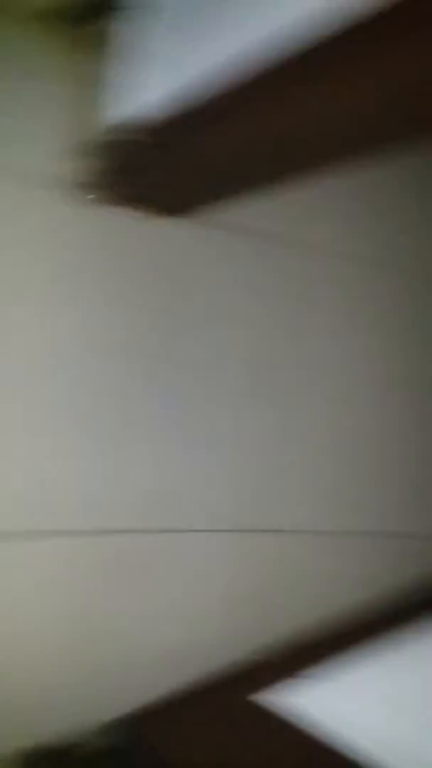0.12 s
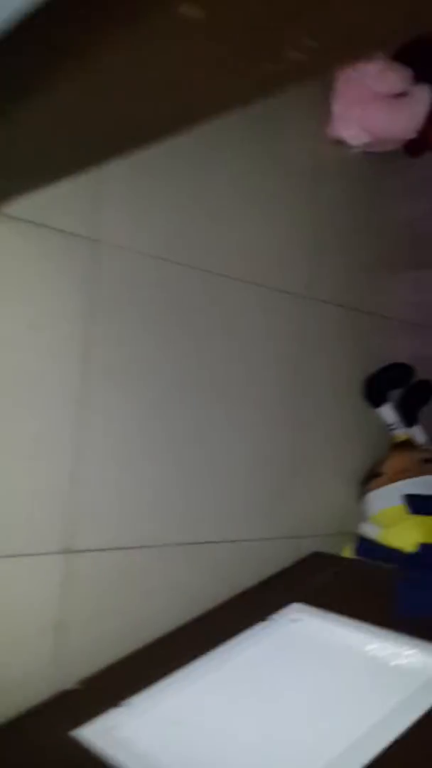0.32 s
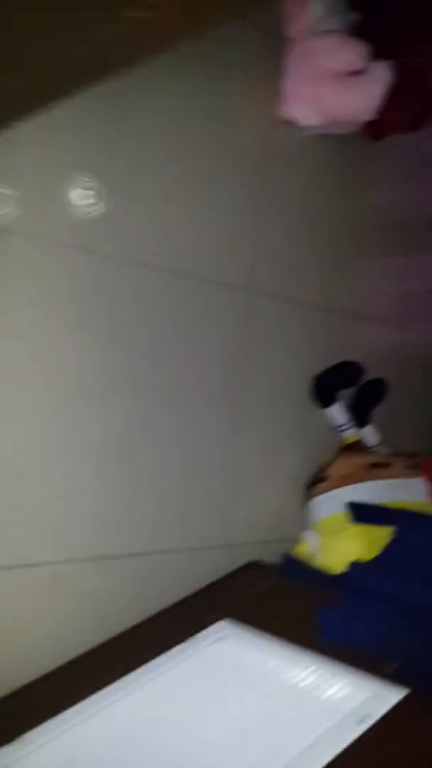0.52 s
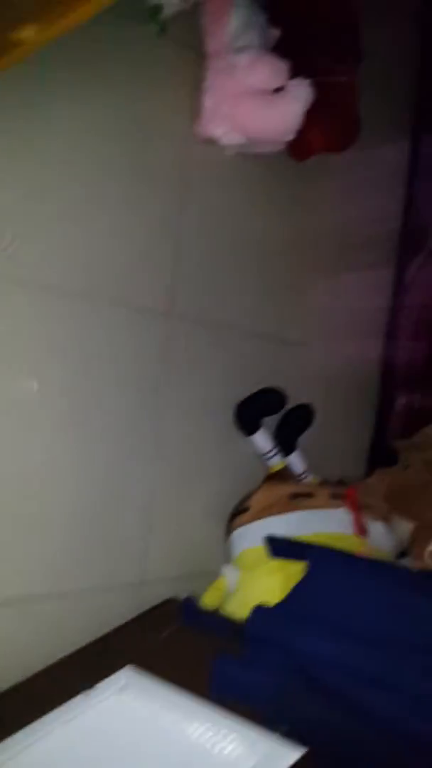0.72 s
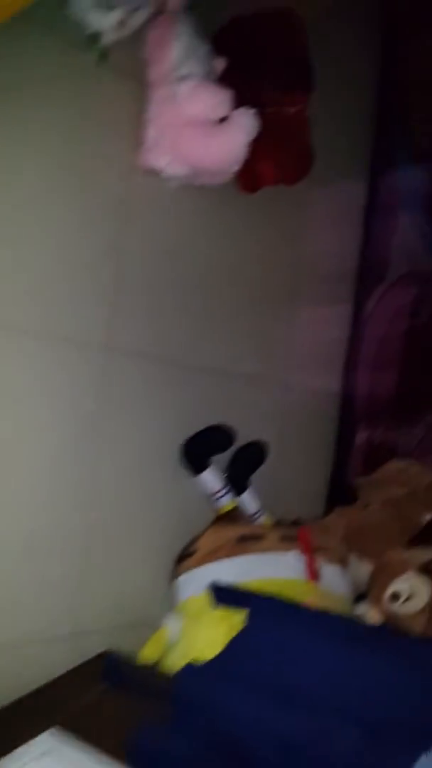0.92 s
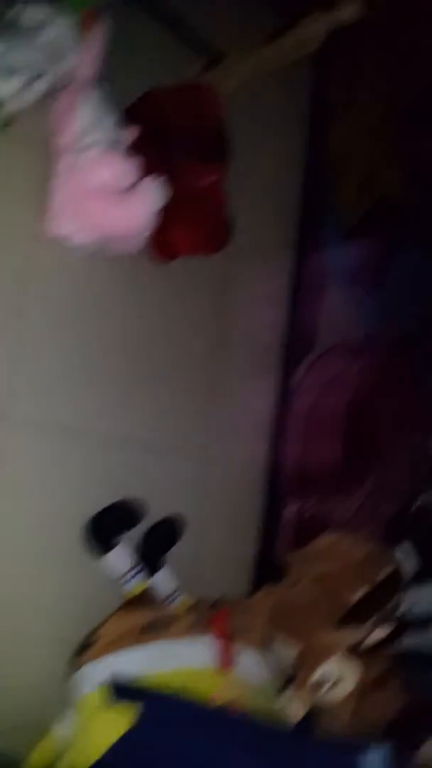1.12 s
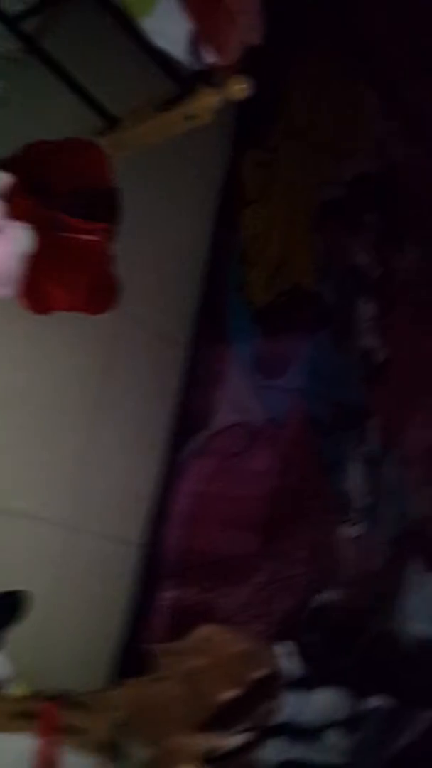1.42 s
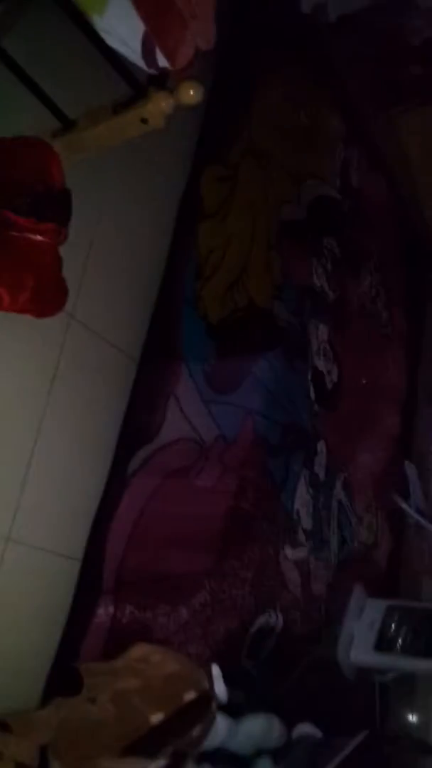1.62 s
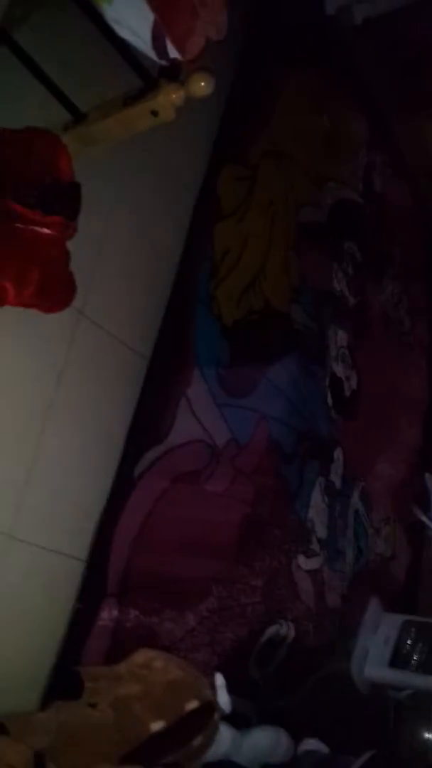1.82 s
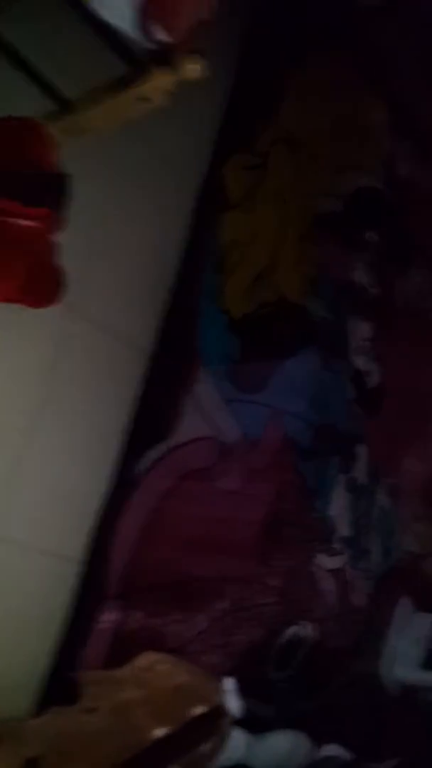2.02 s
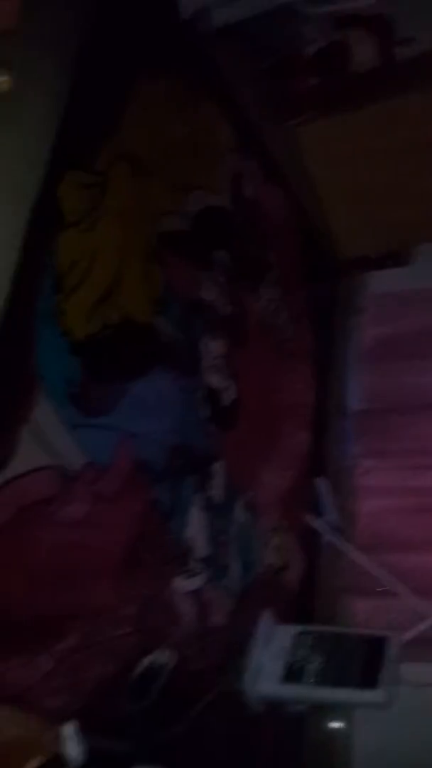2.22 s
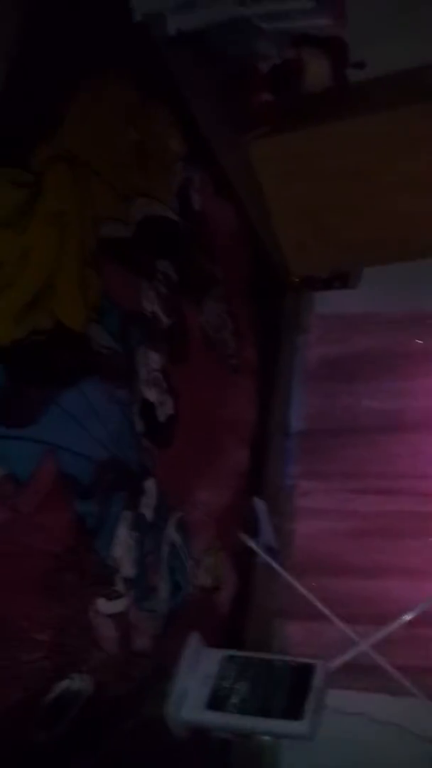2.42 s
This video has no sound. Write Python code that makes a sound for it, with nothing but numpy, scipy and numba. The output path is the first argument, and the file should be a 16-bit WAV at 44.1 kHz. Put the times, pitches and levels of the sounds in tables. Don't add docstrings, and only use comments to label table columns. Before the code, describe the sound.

Water splashes and gurgles around wading feet indoors, with bubbly plops, bright droplets and brief pauses

```python
import sys
import numpy as np
from scipy import signal
from scipy.fft import rfft, irfft, next_fast_len
from scipy.io import wavfile
from scipy.ndimage import uniform_filter1d
from numba import njit

SR = 44100
rng = np.random.default_rng(int(sys.argv[2]) if len(sys.argv) > 2 else 0)


def log_audio(samples):
    frames = np.atleast_2d(samples).T
    limited = np.clip(frames, -1, 1)
    pcm = np.round(limited * 32767).astype(np.int16)
    wavfile.write(sys.argv[1], SR, pcm)


def gain_from_db(level_db):
    decades = np.asarray(level_db, float) / 20
    return 10 ** decades


N = 114660


def unit(x):
    return x / np.sqrt(np.mean(x ** 2))


def read(table, hz):
    table = np.array(table)
    return np.interp(np.log(hz + 1), np.log(table[:, 0]), table[:, 1])


def colour(x, gain):
    size = next_fast_len(N)
    hz = np.arange(size // 2 + 1) * SR / size
    return irfft(rfft(x, size) * gain(hz), size)[..., :N]


def walk(rate):
    hold = int(SR / rate)
    steps = np.repeat(rng.standard_normal(N // 20), max(hold, 20))[:N]
    return unit(uniform_filter1d(steps, hold))


# (frequency [Hz], level [dB per Hz])
ROOM_TONE = [(25, -11), (100, -12), (300, -14.5), (900, -13.5), (2000, -21.5), (3800, -21.5), (6000, -11.5),
             (9000, -18.5), (15000, -26)]


def room_tone():
    def alike(f):
        return 1 / np.sqrt(1 + (f / 700) ** 4)

    shared, own = rng.standard_normal(N), rng.standard_normal((2, N))
    air = colour(shared, lambda f: gain_from_db(read(ROOM_TONE, f)) * alike(f))
    air = air + colour(own, lambda f: gain_from_db(read(ROOM_TONE, f)) * np.sqrt(1.12 - alike(f) ** 2))
    return unit(air) * gain_from_db(-54.5 + 1.0 * walk(4.3))


# (time [s], level [dB])
HANDLING = [(.62, -78), (.7, -64), (.9, -61), (1.05, -58.5), (1.4, -64.5), (1.6, -66), (2.0, -64.5),
            (2.2, -57.5), (2.33, -57), (2.45, -62), (2.55, -80)]


def handling():
    noise = rng.standard_normal(N) + 0.69 * rng.standard_normal((2, N))
    rumble = unit(colour(noise, lambda f: (f / 120) / (1 + (f / 190) ** 4)))
    s, db = np.array(HANDLING).T
    return rumble * gain_from_db(np.interp(np.arange(N) / SR, s, db, left=-75) + 2 * walk(14.92))


# (start [s], level [dB], hold [s], fall [dB per s], spray tilt [dB per octave])
SURGES = [(0.226, -39, 0.015, 98, 1), (0.237, -41, 0.012, 28, 1), (0.347, -35, 0.051, 130, -0.2),
          (0.475, -37.5, 0.065, 93, -0.6), (0.536, -33.5, 0.083, 249, 3), (0.652, -40, 0.055, 107, 1.5),
          (0.786, -37.5, 0.056, 82, -2.3), (0.89, -41, 0.075, 97, 2.2), (0.972, -36.5, 0.081, 107, -3),
          (1.002, -27, 0.13, 110, 0.2), (1.205, -34.5, 0.044, 262, 1.5), (1.301, -35, 0.012, 173, 1.5),
          (1.405, -53.5, 0.0052, 218, 10), (1.424, -60.5, 0.005, 57, 8), (1.739, -47.5, 0.14, 55, -3.5),
          (1.813, -43.5, 0.058, 105, -1), (1.952, -35, 0.088, 121, 0.4), (2.107, -37, 0.049, 194, 1),
          (2.19, -47, 0.058, 123, 0), (2.277, -44.5, 0.043, 194, 2)]


def churn(t, hz):
    s, db, hold, fall, tilt = np.array(SURGES).T[:, :, None]
    rise = np.clip((t - s) / 0.003, 0, 1)
    level = db - fall * np.maximum(t - s - hold, 0) + tilt * np.log2(hz / 2500)
    power = rise ** 2 * gain_from_db(2 * level)
    return 10 * np.log10(power.sum(0) + 1e-12)


# (frequency [Hz], level [dB])
WATER = [(200, -24), (500, -13), (1000, -1), (2000, 2.5), (4000, -7), (6000, -2), (9000, 0), (15000, -9)]


def sheet(lo_hz, hi_hz):
    def gain(f):
        slope = gain_from_db(read(WATER, f)) / np.sqrt(f + 50)
        return slope / (1 + (lo_hz / (f + 1)) ** 4) / (1 + (f / hi_hz) ** 4)

    noise = rng.standard_normal((2, N)) + .5 * rng.standard_normal(N)
    return unit(colour(noise, gain))


def wash():
    t, flicker_db = np.arange(N) / SR, 3.2
    hiss = sheet(2060.0, 14000.0) * gain_from_db(-11 + churn(t, 10100.0) + flicker_db * walk(130))
    slosh = sheet(550.0, 3300.0) * gain_from_db(-12 + churn(t, 600.0) + flicker_db * walk(35.5))
    return hiss + slosh


@njit
def ring(n, at, step, glide, decay, rise, left, right, lag):
    out = np.zeros((2, n + 8192))
    for e in range(len(at)):
        for c in range(2):
            t = at[e] + c * lag[e]
            i = int(t) + 1
            w = step[e]
            g = left[e] if c == 0 else right[e]
            phase, a, r = w * (i - t), 1., 1.
            while a > .004 and i < n and w < 2.6:
                r *= rise[e]
                out[c, i] += g * a * (1 - r) * np.sin(phase)
                phase += w
                w *= glide[e]
                a *= decay[e]
                i += 1
    return out[:, :n]


def bubbles(s, db, hz, cycles, octaves, spread=0.98, rise_cycles=0.95):
    lag_s, lag_spread_s, pan_spread_db = 0.0003055, 0.00017, 2.5
    spot = spread * rng.standard_normal((len(s), 2)).T
    life = np.maximum(cycles, .5) * SR / hz
    pan_db = pan_spread_db * spot[0] / 2
    lag = (lag_s * np.minimum(hz / 1400, 1) ** 2 + lag_spread_s * spot[1]) * SR
    return ring(N, np.maximum(s, .01) * SR, 2 * np.pi * hz / SR, 2 ** (octaves / life), gain_from_db(-30 / life),
                np.exp(-hz / SR / rise_cycles), gain_from_db(db + pan_db), gain_from_db(db - pan_db), lag)


def swarm(count, lo_hz, hi_hz, cycles, octaves, scatter_db, clump_db):
    u, clump = rng.random((count, 4)).T, walk(45.04)
    s, hz = u[0] * N / SR, lo_hz * (hi_hz / lo_hz) ** u[1]
    db = read(WATER, hz) + scatter_db * np.minimum(-np.log(u[2]), 2.4)
    life = cycles * (.5 + u[3])
    norm = np.sqrt(np.sum(gain_from_db(2 * db) * life * SR / hz / 14) / N)
    db = db + churn(s, hz) + clump_db * clump[(u[0] * N).astype(int)]
    return bubbles(s, db, hz, life, octaves * u[3] * 2, rise_cycles=1.28) / norm


def bubble_cloud():
    body = swarm(count=1900, lo_hz=301.1, hi_hz=4490, cycles=16.84, octaves=0.312,
                 scatter_db=4.5, clump_db=1.5)
    fizz = swarm(count=9000, lo_hz=2720, hi_hz=14500, cycles=8.4, octaves=0.18,
                 scatter_db=1.5, clump_db=4.5)
    return gain_from_db(-3.5) * (body + fizz)


# (time [s], peak level [dB], pitch [Hz])
TICKS = [(0.2235, -24.5, 5770), (0.5108, -15.5, 6040), (0.5465, -5, 4680), (0.5843, -11.5, 5400),
         (0.591, -10.5, 5950), (0.6251, -7.5, 6020), (1.0126, -15, 5770), (1.1508, -17, 5800),
         (1.259, -15, 5100), (1.3153, -10.5, 6160), (1.353, -21, 5600), (1.39, -21, 6420),
         (1.4216, -10, 6140), (1.7549, -11.5, 5290), (1.949, -14.5, 6000), (1.99, -18, 5700),
         (2.055, -18, 4840), (2.2592, -21.5, 6100), (2.3155, -19, 6370), (2.3349, -12.5, 6220),
         (2.492, -21.5, 7400),
         (0.366, -17.5, 5490), (0.4802, -24.5, 5930), (0.803, -22, 5900), (0.899, -20.5, 5870),
         (0.9773, -17, 5340), (1.016, -7.5, 5330), (1.051, -21, 5370), (1.0893, -3.5, 7020),
         (1.134, -11.5, 5530), (1.15, -5, 7600), (1.1854, -10, 7400), (1.223, -17, 5660),
         (1.239, -16, 5360), (1.25, -14.5, 5430), (1.262, -8, 8140), (1.4215, -10.5, 8560),
         (1.662, -29, 5470), (1.692, -34, 4000), (1.8206, -27.5, 5320), (1.964, -18.5, 3430),
         (1.9735, -21, 6200), (2.0426, -18.5, 5850), (2.0751, -26, 5600), (2.1103, -16.5, 6170),
         (2.1529, -20, 5230), (2.225, -26, 5470)]


def drops():
    s, db, hz = np.array(TICKS, float).T
    one = np.ones(len(s))
    first = bubbles(s, db - 9.5, hz, 14 * one, 0.015 * one, spread=1.0, rise_cycles=0.62)
    second = bubbles(s + 0.001209, db - 8.5, hz * 1.033, 22 * one, 0.01 * one,
                     spread=0.97, rise_cycles=5.1)
    crack = bubbles(s, db - 11, hz * 1.55, 7 * one, 0 * one, spread=0.75, rise_cycles=0.65)
    return first + second + crack


# (time [s], peak level [dB], pitch [Hz], cycles)
PLOPS = [(0.722, -27, 840, 20.6), (0.82, -22.5, 1085, 33), (0.842, -30, 1052, 42), (0.89, -29, 1374, 30),
         (0.895, -27.5, 777, 17), (0.92, -25, 1810, 40), (0.98, -21, 2420, 31), (1.017, -14, 990, 16),
         (1.14, -12.5, 957, 9.9), (1.15, -17, 2310, 29), (1.226, -19, 1530, 22), (1.237, -18, 2540, 19),
         (1.254, -18, 2555, 24), (1.312, -28, 1607, 48), (1.361, -21.5, 1484, 11), (1.396, -34, 2040, 19),
         (1.42, -29.5, 1630, 29), (1.938, -30, 2130, 32), (2.014, -30, 759, 39), (2.107, -25, 1660, 14),
         (2.132, -33, 1970, 13), (2.148, -27, 986, 17.4), (2.283, -42, 1600, 34),
         (2.314, -23.5, 2350, 15.6)]


def plops():
    plop = np.array(PLOPS, float).T
    return bubbles(*plop, np.full(len(PLOPS), 0.15), spread=0.66, rise_cycles=2.9)


def broods(s, db, hz, cycles, count=4):
    u = rng.random((len(s), count, 3)).T
    late_s = s + 0.002956 + 0.046 * u[0]
    late_db = db - 3.5 - 8 * u[0]
    late_hz = hz * 2 ** (0.44 * (u[1] - .4))
    late_cycles = cycles * (0.32 + 1.04 * u[2])
    late = (late_s, late_db, late_hz, late_cycles, 0.26 * u[2])
    return bubbles(*(v.ravel() for v in late), spread=0.53)


# (time [s], peak level [dB], start pitch [Hz], cycles, glide [octaves])
DRIPS = [(.338, -31, 330, 10, .4), (.372, -30, 450, 13, .25), (.415, -33, 210, 8, .2),
         (.50, -29, 270, 8, .3), (.514, -24, 1200, 34, .7), (.802, -31, 500, 13, .15),
         (.815, -25, 2050, 40, .1), (1.012, -14, 2900, 28, .1), (1.034, -26, 180, 8, .2),
         (1.733, -41, 800, 14, .2), (1.98, -34, 470, 14, .2), (2.195, -35, 520, 18, .1)]
# (time [s], peak level [dB], start pitch [Hz], cycles, glide [octaves])
CHIRPS = [
    (2.283, -33, 720, 28, 1.1),
    (2.36, -38, 610, 32, .85),
    (1.861, -21, 1700, 26, .4),
    (1.79, -35, 950, 40, .9),
    (1.815, -32, 1700, 40, .5),
    (2.288, -33, 1900, 36, .5),
]


def drips():
    drip = np.array(DRIPS + CHIRPS, float).T
    return broods(*drip[:4, :len(DRIPS)]) + bubbles(*drip, spread=0.89, rise_cycles=4.0)


# (time [s], peak level [dB], pitch [Hz], cycles)
GULPS = [(0.241, -13, 1590, 5.1), (0.354, -32, 1650, 21), (0.423, -23, 1958, 44), (0.503, -23, 735, 9),
         (0.545, -17.5, 1062, 17.4), (0.549, -17, 860, 11.5), (0.664, -29, 952, 40),
         (0.795, -12.5, 1050, 5.9), (0.804, -10.5, 1080, 6.6), (0.972, -26.5, 773, 19.4),
         (1.007, -21, 980, 8), (1.047, -15.5, 1053, 12.3), (1.06, -2.5, 1180, 3), (1.158, -18, 970, 6.1),
         (1.184, -28.5, 715, 37), (1.259, -19.5, 1704, 25), (1.767, -28.5, 723, 9),
         (1.847, -22.5, 1290, 9.4), (1.953, -20, 1337, 36.5), (1.98, -28, 1273, 39),
         (2.152, -23, 2340, 11.7), (2.19, -27.5, 1615, 21)]


def gulps():
    gulp = np.array(GULPS, float).T
    return bubbles(*gulp, 0.12 + 0 * gulp[0], spread=0.63) + broods(*gulp)


@njit
def walls(x, lags, gain, damp):
    line, soft, out = np.zeros((8, 4096)), np.zeros(8), np.zeros((2, len(x)))
    for i in range(len(x)):
        total = 0.
        for k in range(8):
            soft[k] += (1 - damp) * (gain[k] * line[k, (i - lags[k]) & 4095] - soft[k])
            total += soft[k]
            out[k % 2, i] += soft[k]
        for k in range(8):
            line[k, i & 4095] = x[i] + soft[k] - total / 4
    return out


def room(water):
    t60_s, damp, echo_db = 0.25, 0.23, -7
    lags = rng.integers(350, 1900, 8)
    echo = walls(water.sum(0) / 2, lags, gain_from_db(-60 * lags / SR / t60_s), damp)
    return water + gain_from_db(echo_db) * echo


# (frequency [Hz], left minus right [dB])
BALANCE = [(100, 10), (600, -3.5), (1300, 5), (2500, -2.5), (7000, -5.5), (9500, -10), (15000, -12.5)]


def ports(wet):
    port_hz, width_hz = 5834, 1490
    peak = gain_from_db([[15.5], [-7.5]])
    sides = np.array([[.5], [-.5]])

    def heard(f):
        port = 1 + peak / (1 + 1j * (f - port_hz) / (width_hz / 2))
        return port * gain_from_db(sides * read(BALANCE, f)) / (1 + (110 / (f + 1)) ** 4)

    return colour(wet, heard)


def duck_bass(still):
    bass = colour(still, lambda f: 1 / (1 + (f / 300) ** 4))
    spray_db = uniform_filter1d(churn(np.arange(N) / SR, 6000.), size=1500)
    duck = gain_from_db(-0.44 * np.maximum(spray_db + 29, 0))
    return still - (1 - duck) * bass


def scene():
    still = room_tone() + handling()
    water = wash() + bubble_cloud() + drops() + plops() + drips() + gulps()
    return duck_bass(still) + ports(room(water))


# (start [s], length [s], cut below [Hz], share taken)
GUARD = [
    (.24, .06, 380, .75),
    (.34, .1, 140, .7),
    (.555, .09, 200, 1),
    (1.15, .04, 140, .9),
    (1.255, .035, 200, .9),
    (2.02, .11, 130, .7),
]


def guard(x):
    t, out = np.arange(N) / SR, x
    for s, length, hz, share in GUARD:
        window = uniform_filter1d(1. * (np.abs(t - s - length / 2) < length / 2), size=500)
        out = out - window * share * colour(x, lambda f: 1 / (1 + (f / hz) ** 8))
    return out


def roll_off(x):
    return signal.sosfilt(signal.butter(12, 15900, fs=SR, output="sos"), x)


def record(dry):
    rounded = 0.87 * np.tanh(dry / 0.71)
    top_hz = 14500
    mix = colour(guard(rounded), lambda f: 1 / np.sqrt(1 + (f / top_hz) ** 60))
    return roll_off(mix)


dry = scene()
out = record(dry)
log_audio(out)
```